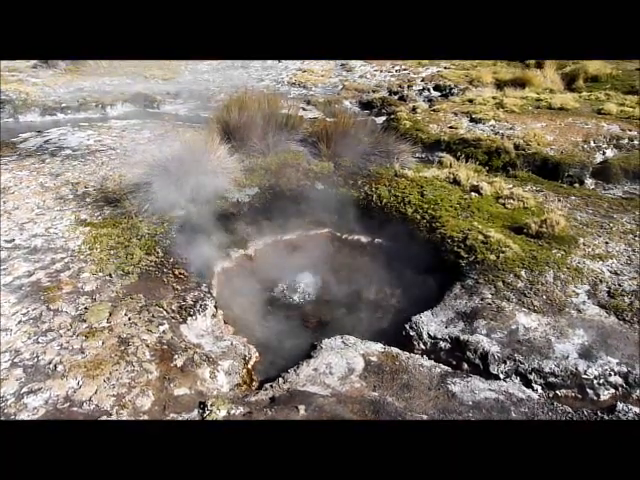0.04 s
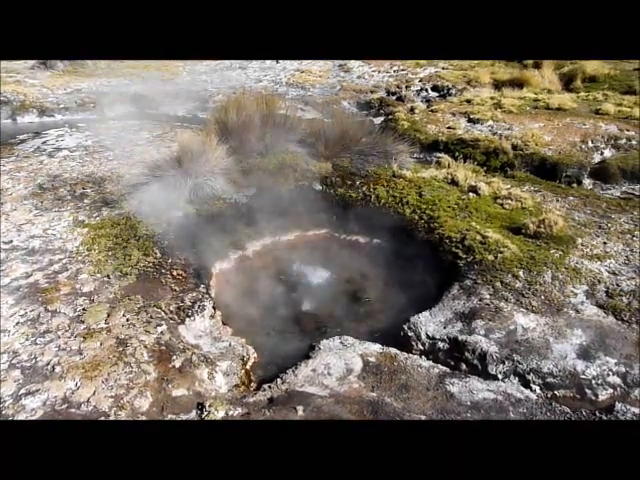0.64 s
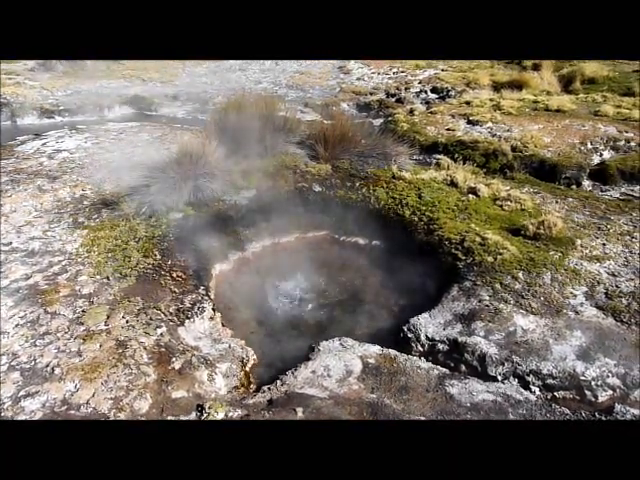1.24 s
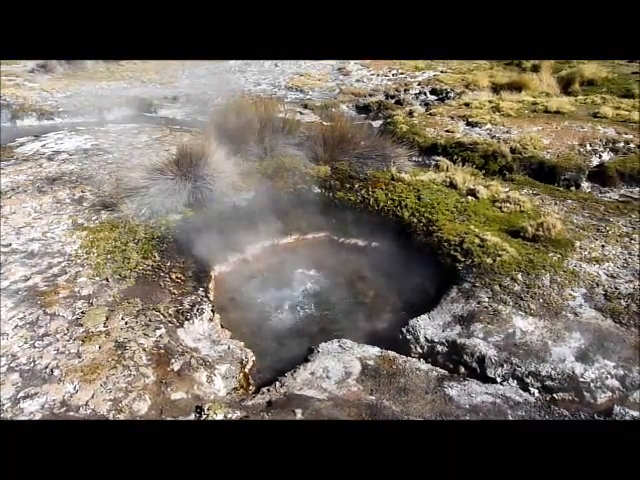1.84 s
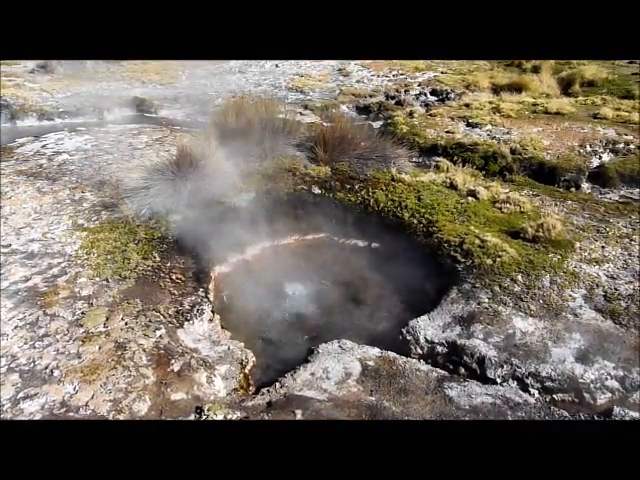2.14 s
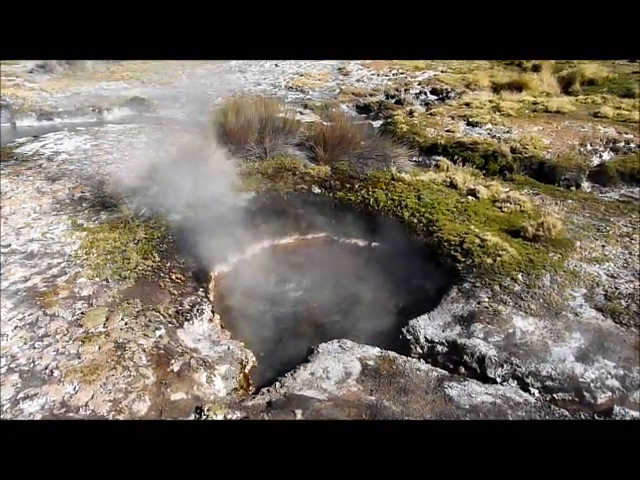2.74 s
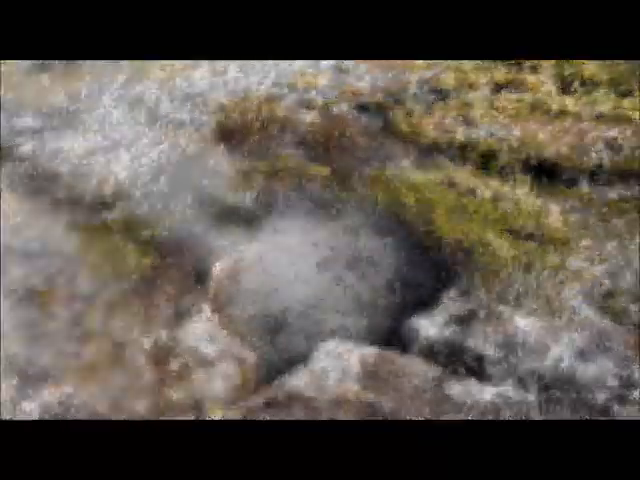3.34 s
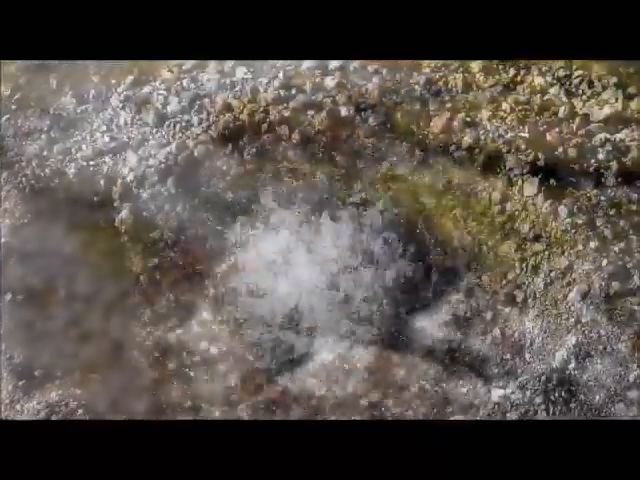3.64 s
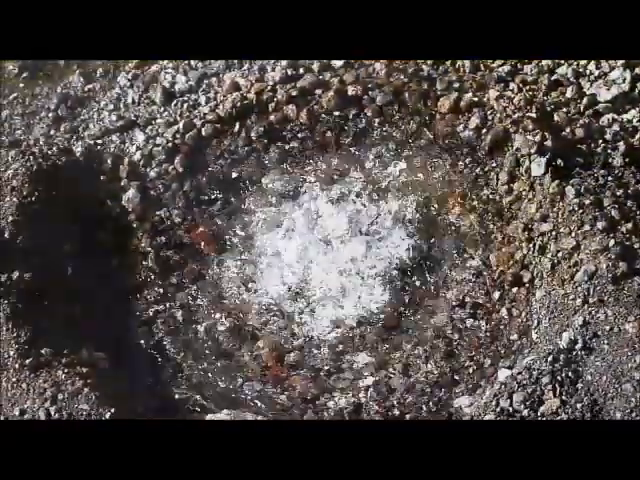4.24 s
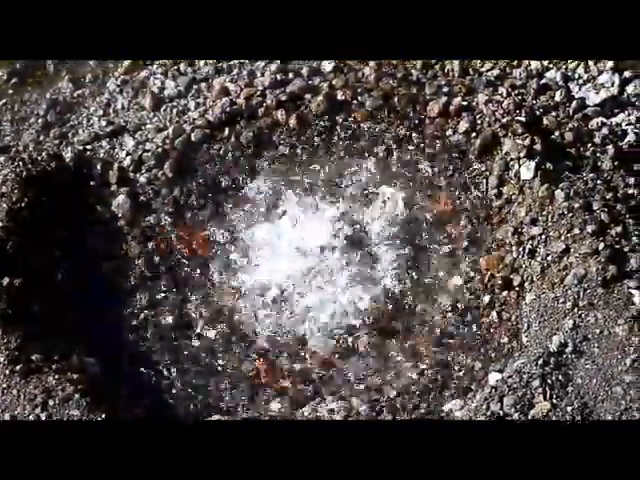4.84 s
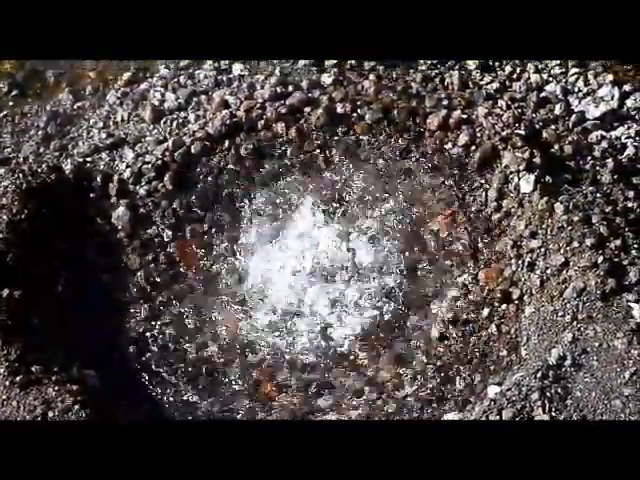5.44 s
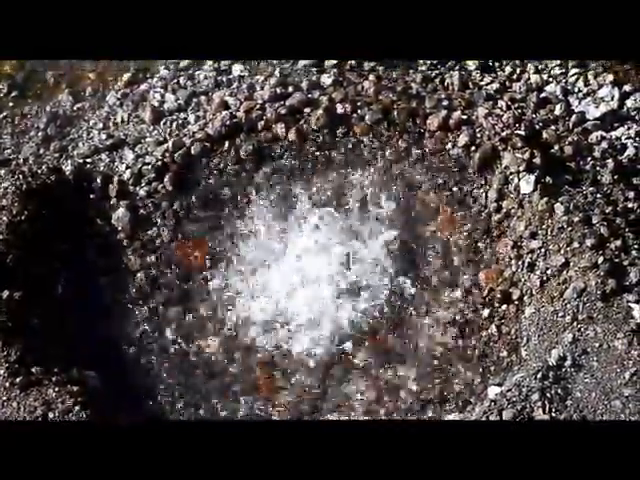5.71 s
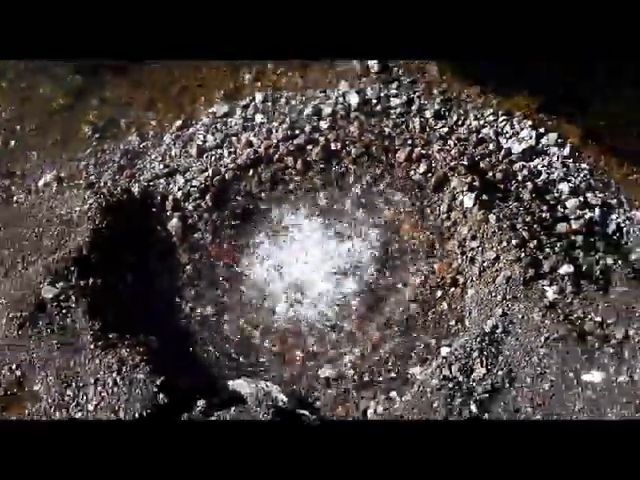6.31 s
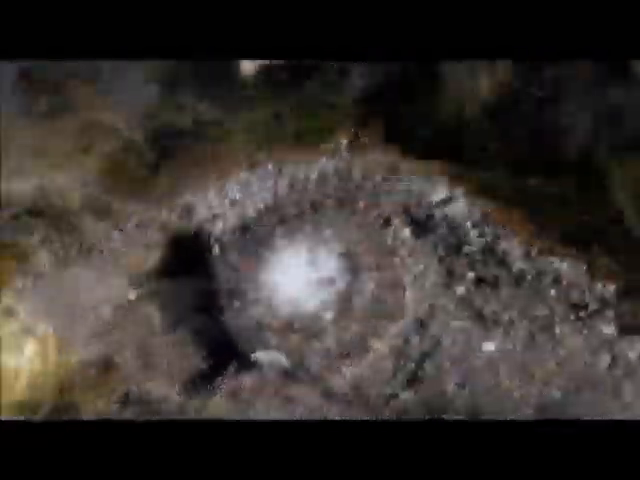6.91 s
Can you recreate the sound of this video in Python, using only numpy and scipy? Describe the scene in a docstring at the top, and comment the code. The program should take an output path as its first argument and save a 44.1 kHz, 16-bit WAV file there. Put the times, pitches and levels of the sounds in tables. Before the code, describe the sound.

From the start, a hot spring pool gurgles and simmers close by, with a light fizz on top. It heaves in irregular bursts that slap back and scatter spray, at about 0.2, 0.8, 1.4, 2 and 2.6 seconds. Small bright drips and rounded plops stand out between the splashes.

Just after 3 seconds, a small click marks an abrupt change to a second spring boiling through gravel. It is somewhat louder and fuller: a dense, even churning of bubbles with a fine crackling fizz and sharp drips leaning to the left. A stronger surge at about 5 seconds brings a cluster of deeper gurgles and plops. Short wet slaps poke through at around 4, 4.7, 5.6 and 5.8 seconds. The churning eases slightly, swells once more near 6.7 seconds and carries on to the end, just before 7 seconds.

```python
"""A hot spring pool gurgles close by and throws up bursts of water that slap back and scatter spray.
At about 3 s the scene changes with a click to a second spring, a gravel vent that churns densely.
Steam drives both: swarms of bubbles ring, large ones low and small ones high, and bursting films crackle.
Single drips, plops and slaps stand out from the boil."""
import sys
import numpy as np
from scipy import signal
from scipy.fft import rfft, irfft, next_fast_len
from scipy.io import wavfile

SR = 44100
rng = np.random.default_rng(int(sys.argv[2]) if len(sys.argv) > 2 else 0)


def generate_wav(sig):
    """Save sig (samples, or channels by samples) to the path in sys.argv[1] as 16-bit PCM at SR."""
    pcm = np.round(np.clip(np.atleast_2d(sig).T, -1, 1) * 32767).astype(np.int16)
    wavfile.write(sys.argv[1], SR, pcm)


N = 307377
TIME = np.arange(N) / SR
FREQS = np.fft.rfftfreq(N, 1 / SR)
SCENE_CHANGE_S = 3.061


def gain_of(db):
    """dB to amplitude."""
    return 10 ** (np.asarray(db) / 20)


def db_of(gain):
    """Amplitude to dB."""
    return 20 * np.log10(gain + 1e-9)


def sum_db(*levels_db):
    """Power sum of unrelated sounds."""
    return 10 * np.log10(sum(gain_of(db) ** 2 for db in levels_db))


def unit_rms(x):
    """Scales to rms 1."""
    return x / np.sqrt(np.mean(abs(x) ** 2) + 1e-20)


def over_freqs(points):
    """Interpolates (f/Hz, value) rows at FREQS on a log axis."""
    hz, value = np.transpose(points)
    return np.interp(np.log(FREQS + 1), np.log(hz + 1), value)


def colour(spectrum, lo_hz, hi_hz):
    """Gain of a spectrum table within a soft-edged band."""
    edges = (1 + (lo_hz / (FREQS + 1)) ** 8) * (1 + (FREQS / hi_hz) ** 8)
    return gain_of(over_freqs(spectrum)) / np.sqrt(edges)


def filtered(x, gain):
    """Applies a gain given at FREQS."""
    size = next_fast_len(N + SR // 10, True)
    response = np.interp(np.fft.rfftfreq(size, 1 / SR), FREQS, gain)
    return irfft(rfft(x, size) * response, size)[..., :N]


def add(mix, start_s, sound):
    """Mixes a sound in at start_s."""
    part = mix[..., max(round(start_s * SR), 0):][..., :sound.shape[-1]]
    part += sound[..., :part.shape[-1]]


def wander(per_s):
    """Random drift of rms 1 with per_s breakpoints a second."""
    return unit_rms(np.interp(TIME * per_s, np.arange(4096), rng.standard_normal(4096)))


def layer(sound, band_gain, level_db, surge_db):
    """Colours a swarm and makes it follow a level, with quick surges."""
    return unit_rms(filtered(sound, band_gain) * gain_of(surge_db)) * gain_of(level_db)


def bubble(hz, cycles, rise, onset_cycles=0.26):
    """An air pocket rings, rising in pitch as it nears the surface; returns a sine/cosine pair."""
    age = np.arange(int(5 * cycles * SR / hz) + 2) * hz / (SR * cycles)  # in decay times
    envelope = (1 - np.exp(-age * cycles / onset_cycles)) * np.exp(-age)
    ring = envelope / envelope.max() * np.exp(2j * np.pi * cycles * (age + rise * age ** 2 / 2))
    return np.array([ring.imag, ring.real])


def swarm(lo_hz, hi_hz, per_s, cycles, rise, spread_db, sizes=28):
    """Bubbles of many sizes, most weak, a few strong; returns direct and scattered sound."""
    out = np.zeros((2, N))
    per_size = int(per_s * N / SR / sizes) + 1
    for hz in np.geomspace(lo_hz, hi_hz, sizes):
        when, chance, *polarities = rng.random((6000, 4))[:per_size].T
        strength = gain_of(spread_db * np.minimum(-np.log(chance + 1e-9), 3.5))
        births = np.zeros((2, N))
        for path, polarity in zip(births, polarities):
            np.add.at(path, (when * N).astype(int), strength * np.sign(polarity - .5))
        rings = signal.oaconvolve(births, bubble(hz, cycles, rise), axes=1)[:, :N]
        out += np.sqrt(hz) * unit_rms(rings)
    return unit_rms(out) * np.sqrt(hi_hz - lo_hz)  # unit power per Hz


def bursting_films(per_s, spread_db, decay_s):
    """Each film bursts with a broad click and a tiny puff of spray."""
    strength = gain_of(spread_db * np.minimum(rng.exponential(1, N), 4))
    bursts = strength * (rng.random(N) < per_s / SR)
    power = signal.lfilter([1], [1, -np.exp(-2 / (decay_s * SR))], bursts ** 2)
    return unit_rms(np.sqrt(power) * rng.standard_normal((2, N))) * np.sqrt(SR / 2)  # unit power per Hz


# Steam pushes through the gravel: t/s, hold/s, decay/s, gurgle level/dB, stir level/dB
STEAM_PUSHES = [(3.048, 0.25, 0.12, -50, -36), (3.466, 0.13, 0.067, -47, -38),
                (4.342, 0.032, 0.099, -55, -37), (5.017, 0.3, 0.16, -42, -37),
                (5.573, 0.02, 0.021, -38, -45), (5.813, 0.04, 0.035, -47, -45),
                (6.732, 0.26, 0.26, -49, -37.5)]


def steam_pushes(rise_s=0.02, stir_s=0.039):
    """Gurgle and stir levels in dB: a push sustains large bubbles but stirs the surface only briefly."""
    gurgle, stir = [], []
    for start_s, hold_s, decay_s, gurgle_db, stir_db in STEAM_PUSHES:
        age_s = np.maximum(TIME - start_s, 0)
        attack = 1 - np.exp(-age_s / rise_s)
        release = np.exp(-np.maximum(age_s - hold_s, 0) / decay_s)
        gurgle.append(gurgle_db + db_of(attack * release))
        stir.append(stir_db + db_of(attack * np.exp(-age_s / stir_s)))
    return sum_db(*gurgle), sum_db(*stir)


# Vent churning, slowly fading: t/s, level/dB
VENT_CHURN = [(3.06, -40.5), (4.15, -42), (4.8, -41), (5.4, -42), (5.95, -43.5), (6.65, -44), (6.85, -43)]
# Vent bubbling and spray spectra: f/Hz, relative level/dB
VENT_BUBBLE_SPECTRUM = [(25, -39.5), (50, -28), (90, -15.5), (150, -8), (250, 0.5), (380, 2.5), (520, -4.5),
                        (700, 0), (950, -1.5), (1300, -5.5), (1600, -12), (2000, -12), (2400, -20.5)]
VENT_SPRAY_SPECTRUM = [(2300, -1.5), (3000, 1.5), (3600, -0.5), (4200, 0), (5050, -1.3), (5900, 0),
                       (6600, -4), (7300, -10.5), (7700, -17.5), (8000, -23)]


def vent():
    """A dense, even boil through gravel under a fine fizz; strong steam pushes make deeper bubbles."""
    churn_db = np.interp(TIME, *np.transpose(VENT_CHURN))
    push_db, stir_db = steam_pushes()
    gurgle_db = sum_db(churn_db - 5, push_db)
    surface_db = sum_db(churn_db, stir_db)
    surge = wander(per_s=75) + 0.18 * wander(per_s=16)
    films = bursting_films(per_s=1800, spread_db=2.0, decay_s=0.0011)
    large = swarm(34, 690, per_s=2200, cycles=2.2, rise=0.02, spread_db=2.5)
    deep = swarm(90, 187, per_s=260, cycles=2.8, rise=0.071, spread_db=3.0)
    deep *= gain_of(-3.5 + 1.5 * (gurgle_db - np.median(gurgle_db)))
    medium = swarm(341, 2644, per_s=3500, cycles=4.0, rise=0.03, spread_db=2.0)
    medium += gain_of(-5) * films
    fine = swarm(2303, 8185, per_s=5200, cycles=9.7, rise=0.017, spread_db=2.5)
    fine += gain_of(-2.5) * films
    gurgle = layer(large + deep, colour(VENT_BUBBLE_SPECTRUM, 20, 553), gurgle_db, 0.5 * surge)
    churn = layer(medium, colour(VENT_BUBBLE_SPECTRUM, 423, 2650), surface_db, 0.49 * surge)
    fizz = layer(fine, colour(VENT_SPRAY_SPECTRUM, 2400, 8500), surface_db - 10, 0.56 * surge)
    return gain_of(-0.98) * gurgle + gain_of(0.48) * churn + gain_of(2.5) * fizz


# Gurgling between eruptions: t/s, level/dB
POOL_GURGLE = [(0, -50.5), (0.25, -57.5), (0.4, -56), (0.68, -56.5), (0.95, -53), (1.25, -51.5),
               (1.46, -54.5), (1.7, -53), (2.17, -55), (2.55, -52), (2.7, -53.5), (3.05, -54.5)]
# Simmering between eruptions: t/s, splash level/dB, spray level/dB
POOL_SIMMER = [(0, -56, -61.5), (0.3, -57, -63), (0.58, -57.5, -64.5), (0.95, -54, -63), (1.2, -53, -58.5),
               (1.5, -55.5, -63.5), (2.15, -56.5, -61.5), (2.35, -56, -63), (3.05, -54, -62.5)]
# Eruptions: collapse t/s, build-up/s, heave level/dB, crash level/dB, spray re splash/dB
POOL_ERUPTIONS = [(0.212, 0.14, -46.5, -56.5, -8.5), (0.81, 0.1, -53, -51.5, -15.5),
                  (1.04, 0.13, -51.5, -64, -12.5), (1.25, 0.12, -58, -61, -1.5),
                  (1.372, 0.14, -47.5, -47.5, -8.5), (2.015, 0.38, -48, -47, -7),
                  (2.588, 0.25, -50.5, -45.5, -11)]


def eruptions(collapse_s=0.052, crash_s=0.027, spray_lag_s=0.0065):
    """Gurgle, splash and spray levels in dB: the simmering pool heaves, then falls back with a crash."""
    gurgle = [np.interp(TIME, *np.transpose(POOL_GURGLE))]
    times_s, *simmer_db = np.transpose(POOL_SIMMER)
    splash, spray = ([np.interp(TIME, times_s, db)] for db in simmer_db)
    for peak_s, build_s, heave_db, crash_db, spray_db in POOL_ERUPTIONS:
        t = TIME - peak_s
        heave = heave_db + db_of(np.exp(np.minimum(t / build_s, -t / collapse_s)))
        crash = crash_db + db_of(np.exp(-(t / crash_s) ** 2 / 2))
        gurgle.append(heave - 4)
        splash += [heave, crash]
        thrown_db = sum_db(heave, crash - 0.5)
        spray.append(spray_db + np.interp(TIME - spray_lag_s, TIME, thrown_db))
    return sum_db(*gurgle), sum_db(*splash), sum_db(*spray)


# Pool bubbling and spray spectra: f/Hz, relative level/dB
POOL_BUBBLE_SPECTRUM = [(30, -50), (60, -42), (100, -36.5), (160, -25.5), (250, -10), (400, -2.5),
                        (520, -10.5), (750, -5.5), (1150, -1), (1430, -13), (1900, -5.5), (2300, -7.5)]
POOL_SPRAY_SPECTRUM = [(2300, -1), (3000, 1), (3600, -6.5), (4200, -4.5), (5050, -9), (5900, -6),
                       (6600, -4), (7300, -5.5), (7700, -13.5), (8000, -22)]


def pool():
    """Steam heaves the pool: a gurgle and a smooth fizz that breaks into spatter at each burst."""
    gurgle_db, splash_db, spray_db = eruptions()
    surge, swell = wander(per_s=74), wander(per_s=22)
    films = bursting_films(per_s=750, spread_db=3.5, decay_s=0.0006)
    large = swarm(49.4, 976, per_s=2200, cycles=3.2, rise=0.061, spread_db=0)
    medium = swarm(480, 2680, per_s=3000, cycles=2.8, rise=0.023, spread_db=1.5)
    drops = swarm(1530, 2370, per_s=700, cycles=3.6, rise=0.029, spread_db=2.5)
    droplets = swarm(2300, 8200, per_s=4100, cycles=8, rise=0.013, spread_db=6.0)
    fizz = swarm(2360, 8340, per_s=13000, cycles=5.5, rise=0.015, spread_db=3.0)
    drop_share = np.clip(0.3 + 0.06 * (spray_db + 62), 0, 1)  # louder spray, more separate drops
    fine = np.sqrt(drop_share) * (droplets + gain_of(-1.5) * films) + np.sqrt(1 - drop_share) * fizz
    medium += np.sqrt(drop_share) * films
    gurgle = layer(large, colour(POOL_BUBBLE_SPECTRUM, 20, 834), gurgle_db, 0.5 * surge + 0.17 * swell)
    splash = layer(medium, colour(POOL_BUBBLE_SPECTRUM, 540, 2670), splash_db,
                   0.87 * surge + 0.35 * swell)
    patter = drop_share * layer(drops, colour(POOL_BUBBLE_SPECTRUM, 1500, 2600), splash_db, 0.6 * surge)
    spray = layer(fine, colour(POOL_SPRAY_SPECTRUM, 2400, 7400), spray_db, 1.1 * surge + 0.5 * swell)
    return gain_of(2.5) * gurgle + gain_of(-1) * splash + gain_of(-3) * patter + gain_of(1.5) * spray


# Single drops: t/s, level/dB, f/Hz, left minus right/dB
DROP_HITS = [(0.2378, -36, 6590, 2), (0.2978, -53, 6650, 3), (0.428, -45, 5970, -12),
             (0.626, -50, 5850, -13), (0.665, -51, 3270, -7), (0.883, -44.5, 6220, -13),
             (0.9497, -44, 6550, -1), (1.022, -41.5, 6400, 1), (1.088, -40, 6610, -2),
             (1.1213, -41.5, 6650, -2), (1.1638, -39, 6600, 1), (1.1788, -38, 6850, 3),
             (1.22, -43, 6790, 0), (1.305, -45, 3200, 5), (1.4554, -45, 4240, 2), (1.6455, -45, 3060, 0),
             (1.865, -37.5, 6200, 3), (1.9712, -31, 6620, 0), (2.1958, -40, 3100, 7),
             (2.273, -50, 3960, -7), (2.834, -49, 6460, 0), (2.9535, -43, 3620, 6), (2.994, -46, 6000, -7),
             (3.053, -37, 3800, 5), (3.1028, -27, 4120, 10), (3.2856, -26.5, 4220, 13),
             (3.3227, -37, 5940, 9), (3.4006, -36, 5900, 11), (3.547, -39, 3740, 9),
             (3.9198, -37.5, 6330, 7), (3.9954, -30, 4380, 13), (4.0363, -33.5, 6670, 2),
             (4.218, -37, 3590, 5), (4.2287, -31.5, 4220, 13), (4.3835, -37, 4120, 12),
             (4.6373, -35.5, 4200, 13), (4.652, -40, 5810, 9), (4.9197, -37.5, 5830, 11),
             (5.039, -35, 5800, 10), (5.4846, -39, 4070, 21), (5.5276, -34.5, 5810, 10),
             (5.616, -40, 3680, 16), (5.621, -38, 6200, 12), (5.8434, -35, 6140, -3.5),
             (5.9895, -38.5, 3120, 11), (6.025, -41, 3270, 10), (6.0887, -39, 3790, 14),
             (6.2031, -34, 3750, -11), (6.3337, -44, 3490, 6), (6.3677, -37, 3720, 15),
             (6.787, -36, 4050, 14)]


def drips(snap_s=0.0011, scatter=0.4):
    """A drop breaks the surface with a bright snap and its tiny bubble rings; each has its own place."""
    snaps, rings = np.zeros((2, 2, N))
    t = np.arange(SR // 50) / SR
    for start_s, db, hz, balance_db in DROP_HITS:
        ring = bubble(hz, cycles=5, rise=0.016, onset_cycles=0.3)
        snap = np.exp(-t / snap_s) * rng.standard_normal((2, len(t)))
        sides = gain_of([[balance_db / 2], [-balance_db / 2]])
        to_stereo = gain_of(db) * sides / sides.mean() * np.array([[1, scatter], [1, -scatter]])
        add(snaps, start_s, to_stereo @ snap)
        add(rings, start_s, gain_of(-0.5) * (to_stereo @ ring))
    return rings + filtered(snaps, colour(VENT_SPRAY_SPECTRUM, 3000, 7400))


# Single large bubbles: t/s, level/dB, f/Hz, length/s, glide/fraction of f
LARGE_BUBBLES = [(0.004, -45.5, 430, 0.017, 0.22), (0.026, -44, 385, 0.018, -0.17),
                 (0.172, -41, 770, 0.024, .03), (0.273, -35.5, 417, 0.028, 0.089),
                 (0.295, -43.5, 560, 0.018, -0.054), (0.31, -47.5, 290, 0.014, -0.17),
                 (1.035, -41, 394, 0.025, 0.11), (1.107, -47, 382, 0.022, 0.015),
                 (1.524, -45, 227, 0.022, 0.56), (1.53, -46, 371, 0.031, 0.025),
                 (2.025, -42, 396, 0.031, 0.14), (2.243, -47, 300, 0.037, 0.12),
                 (3.017, -43, 321, .035, 0.13), (3.071, -31.5, 836, 0.016, .03),
                 (3.259, -39, 506, 0.014, 0.0069), (3.346, -44, 555, .02, 0.12),
                 (3.443, -41, 1374, .016, .03), (3.838, -35.5, 830, .019, 0.11),
                 (4.289, -42, 310, 0.019, 0.036), (4.306, -38, 448, .015, 0.14),
                 (4.355, -36, 793, .022, 0.027), (4.388, -37, 1090, .014, .04),
                 (4.476, -45, 293, 0.023, 0.025), (5.025, -34.5, 347, 0.021, -0.097),
                 (5.053, -36.5, 411, 0.039, -0.17), (5.057, -37, 733, 0.02, -0.13),
                 (5.059, -38, 194, 0.024, 0.075), (5.076, -36, 310, 0.032, .1), (5.102, -41, 205, .034, .1),
                 (5.12, -39, 336, .03, 0.21), (5.198, -37, 505, .026, 0.16),
                 (5.218, -37.5, 228, 0.041, 0.097), (5.24, -37, 348, .026, -0.046),
                 (5.301, -40.5, 315, 0.029, 0.18), (5.387, -43, 380, .03, -0.061),
                 (5.578, -38, 1266, 0.016, .03), (5.86, -41.5, 372, 0.021, -0.053)]


def plops():
    """A large bubble's tone swells and dies as it breaks loose, gliding up or down."""
    out = np.zeros((2, N))
    for start_s, db, hz, length_s, glide in LARGE_BUBBLES:
        progress = np.arange(0, length_s, 1 / SR) / length_s
        turns = np.cumsum(hz * (1 + glide * (progress - .5))) / SR
        ring = np.sin(np.pi * progress) ** 2 * np.exp(2j * np.pi * turns)
        add(out, start_s, gain_of(db) * np.array([ring.imag, ring.real]))
    return out


# Water slapping down: t/s, level/dB, air pocket f/Hz, relative spray level/dB, decay/s
WATER_SLAPS = [(0.030, -38, 1800, -10, .004), (0.111, -32.5, 875, -6, 0.0038),
               (0.145, -35, 1900, -3.5, .0012), (0.171, -38, 990, -12, 0.0036),
               (0.196, -37.5, 1900, -20, .002), (0.214, -35, 1130, -20, 0.0026),
               (0.222, -36, 1116, -1, 0.0027), (0.782, -30, 1880, -10, .0015),
               (0.802, -35.5, 1930, -9, .0015), (0.818, -29, 750, -31, 0.0019),
               (0.84, -35, 1860, -15, 0.0016), (1.048, -24, 2040, -15, 0.0014),
               (1.237, -29, 1920, -5.5, 0.0016), (1.242, -43, 1500, 6, 0.002),
               (1.343, -26, 890, -30, 0.0043), (1.361, -39, 1900, -16, 0.0043),
               (1.3705, -30, 1970, -18, .0015), (1.3722, -24.5, 1130, -16, 0.0015),
               (1.392, -32, 1140, -7, 0.0039), (1.403, -32.5, 1050, -22, 0.0028),
               (1.533, -35, 634, -29, 0.011), (1.746, -36, 1690, -3, 0.0026),
               (1.797, -30, 1240, -12, 0.0026), (1.877, -33, 984, -12, .002), (1.903, -29.5, 970, -6, .002),
               (1.934, -33.5, 907, -13, 0.0052), (1.952, -35, 1950, -9, .003),
               (2.011, -36, 1900, -19, .003), (2.0216, -29.5, 1140, -10, 0.0073),
               (2.023, -23, 1880, -14, 0.0035), (2.041, -32.5, 1100, -19, 0.0057),
               (2.101, -40.5, 1700, 9.5, 0.0018), (2.117, -37.5, 1900, -10, .002),
               (2.32, -33.5, 890, -28, 0.0027), (2.335, -36, 1090, -24, .002),
               (2.579, -30, 1230, -30, 0.0035), (2.581, -35, 2100, -22, 0.0022),
               (2.607, -37, 1900, -5, 0.0018), (2.619, -36, 1190, -7, 0.0048),
               (2.697, -42, 1140, -22, 0.0036), (2.753, -33.5, 880, -24, .002),
               (3.023, -35, 848, -21, 0.0023), (3.066, -28.5, 820, -19, 0.0032),
               (3.692, -27.5, 850, -21, 0.0016), (3.978, -24.5, 895, -22, 0.0035),
               (4.203, -30.5, 1850, -18, .003), (4.715, -25, 703, -17, 0.0023),
               (5.06, -31.5, 740, -17, 0.0052), (5.593, -27, 880, -22, 0.0044),
               (5.601, -33, 596, -14, .004), (5.834, -21, 723, -22.5, 0.0038),
               (5.871, -27.5, 615, -26, 0.0032)]


def slaps(rise_s=0.00052, ring_lag_s=0.00076, spray_s=0.0043, band_ratio=1.3):
    """Falling water hits with a short burst around the pitch of the air it traps, and throws spray."""
    pockets, splash, spray = np.zeros((3, 2, N))
    t = np.arange(SR // 25) / SR
    for start_s, db, hz, spray_db, decay_s in WATER_SLAPS:
        envelope = (1 - np.exp(-t / rise_s)) * np.exp(-t / decay_s)
        burst = rng.standard_normal((2, len(t))) * envelope * gain_of(db)
        band = signal.butter(1, [hz / band_ratio, hz * band_ratio], "bandpass", fs=SR)
        add(pockets, start_s + ring_lag_s, gain_of(db - 4.5) * bubble(hz, cycles=2.9, rise=0.02))
        add(splash, start_s, signal.lfilter(*band, burst))
        add(spray, start_s, burst * gain_of(spray_db) * np.exp(-t / spray_s))
    radiation = 1 / (1 + (330 / (FREQS + 1)) ** 4)  # a small pocket gives off no bass
    return (filtered(pockets, radiation)
            + gain_of(-1.5) * filtered(splash, unit_rms(colour(POOL_BUBBLE_SPECTRUM, 430, 2800)))
            + gain_of(3) * filtered(spray, unit_rms(colour(POOL_SPRAY_SPECTRUM, 1800, 12000))))


def microphones(pair, coherence, balance, lead):
    """Direct sound reaches both microphones, one a little later; scattered sound differs between them."""
    likeness = np.clip(over_freqs(coherence), 0, .999)
    direct, scattered = np.sqrt((1 + likeness) / 2), np.sqrt((1 - likeness) / 2)
    left = gain_of(over_freqs(balance) / 2) * np.exp(.5j * over_freqs(lead))
    right = 1 / left
    mid_gain = np.hypot(direct * abs(left + right), scattered * abs(left - right)) / 2
    return np.array([filtered(pair[0], side * direct / mid_gain)
                     + filtered(pair[1], sign * side * scattered / mid_gain)
                     for side, sign in ((left, 1), (right, -1))])


# Likeness of the two microphones: f/Hz, coherence/0-1
POOL_LIKENESS = [(100, 0.97), (400, 1.0), (1100, 0.97), (1450, 0.71), (2000, 0.95), (3000, 0.71),
                 (3600, 0.2), (4200, 0.75), (5000, 0.37), (5800, 0.31), (6600, 0.79), (7400, 0.23)]
VENT_LIKENESS = [(100, 0.81), (400, 0.91), (900, 0.97), (1400, 0.8), (2000, 0.45), (3000, 0.4),
                 (4000, 0.51), (5100, 0.65), (6000, 0.6), (6800, 0.64), (7500, 0.37)]
# Stereo balance: f/Hz, left minus right/dB
POOL_PAN_DB = [(100, -9.5), (400, -2), (1100, -1), (1450, -2.5), (2000, 1), (3000, 0), (3600, 5),
               (4200, -2.5), (5000, -5.5), (5800, 5.5), (6600, -5), (7400, -1.5)]
VENT_PAN_DB = [(100, 1), (400, -1.5), (900, 0.5), (1400, 0), (2000, 4), (3000, 5.5), (4000, 12),
               (5100, 10.5), (6000, 9.5), (6800, 2), (7500, 3.5)]
# Stereo phase: f/Hz, left lead/rad
POOL_LEAD_RAD = [(100, 0.01), (400, 0.07), (1100, 0.29), (1450, 0.92), (2000, 0.95), (3000, 1.19),
                 (3600, -1.69), (4200, 0.47), (5000, 0.67), (5800, 1.43), (6600, -0.51), (7400, 0.2)]
VENT_LEAD_RAD = [(100, 0.11), (400, 0.14), (900, 0.29), (1400, 0.86), (2000, 1.48), (3000, -0.12),
                 (4000, -0.9), (5100, 1.18), (6000, 1.12), (6800, 1.73), (7500, 2.59)]


def scene():
    """The pool, then the vent, each with slaps, plops and drips."""
    events = slaps() + plops()
    at_pool = microphones(pool() + events, POOL_LIKENESS, POOL_PAN_DB, POOL_LEAD_RAD)
    at_vent = microphones(vent() + events, VENT_LIKENESS, VENT_PAN_DB, VENT_LEAD_RAD)
    return np.where(TIME < SCENE_CHANGE_S, at_pool, at_vent) + drips()


def change_click(db=-33, decay_s=0.00026):
    """A small step at the scene change clicks across all frequencies."""
    out = np.zeros(N)
    add(out, SCENE_CHANGE_S, gain_of(db) * np.exp(-np.arange(SR // 20) / (SR * decay_s)))
    return out


def low_passed(x, hz):
    """Steep band limit."""
    taps = signal.firwin(401, hz, window=("kaiser", 8), fs=SR)
    return signal.oaconvolve(x, taps[None], "same")


# Microphone notches: f/Hz, width/Hz
MIC_NOTCHES = [(2600, 1016), (4608, 695), (5438, 274)]


def record(dry):
    """Microphone notches and band limit; the click reaches higher than the water."""
    for hz, width_hz in MIC_NOTCHES:
        dry = signal.lfilter(*signal.iirnotch(hz, hz / width_hz, SR), dry)
    water = low_passed(dry, hz=7900)
    return low_passed(water + change_click(), hz=16000)


dry = scene()
out = record(dry)
generate_wav(out)
```